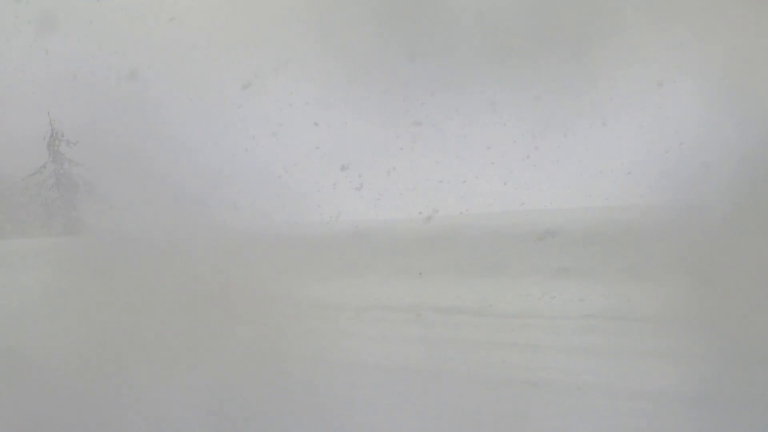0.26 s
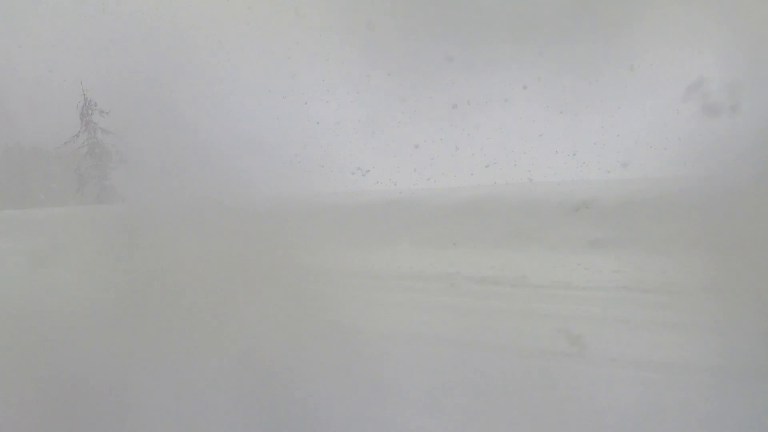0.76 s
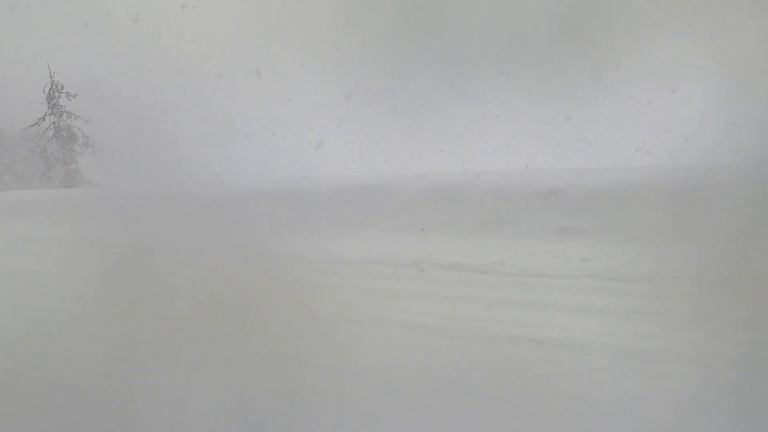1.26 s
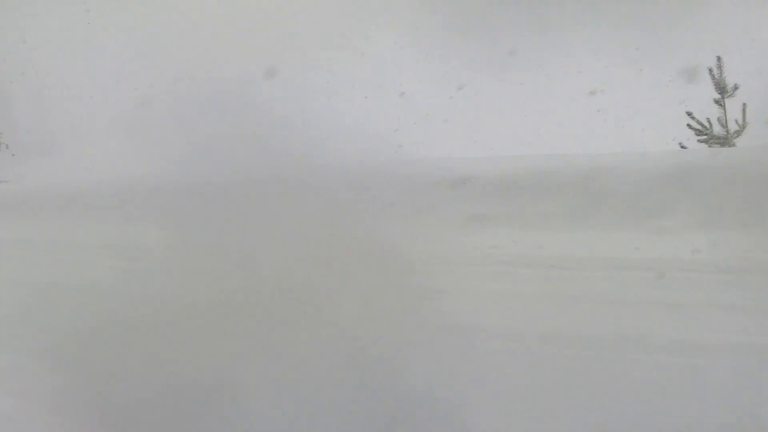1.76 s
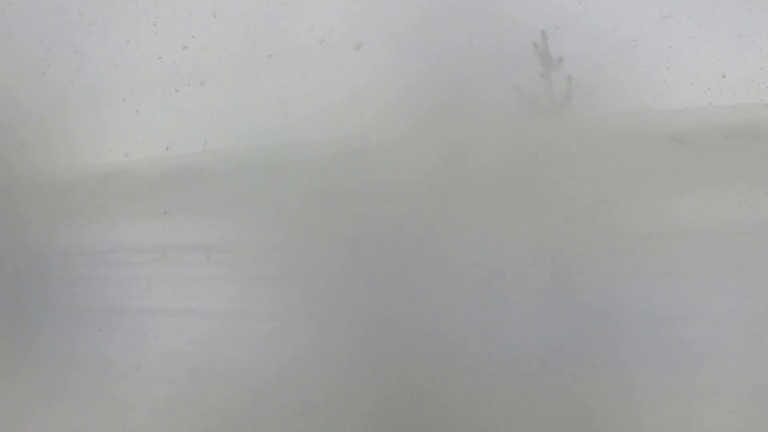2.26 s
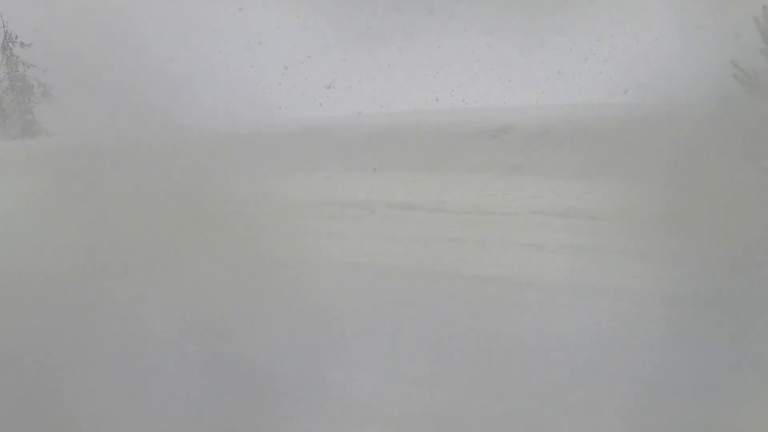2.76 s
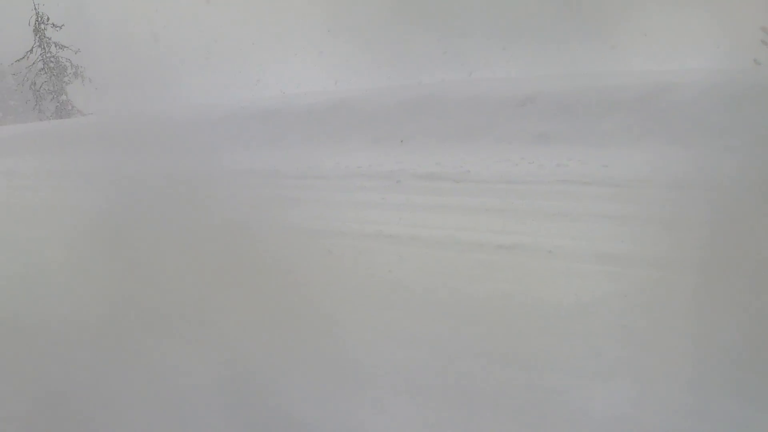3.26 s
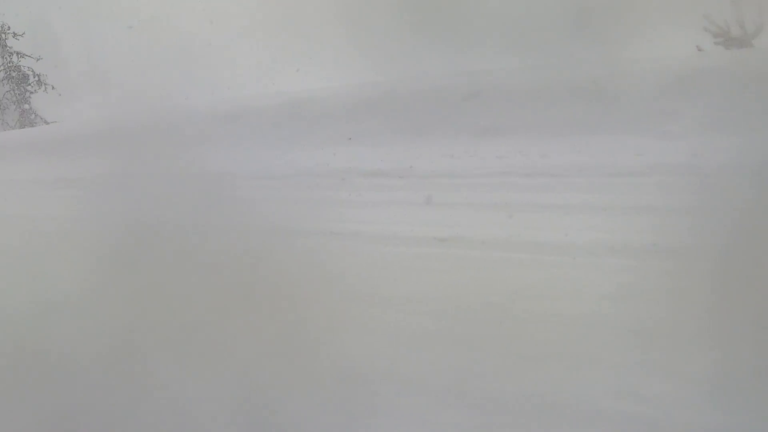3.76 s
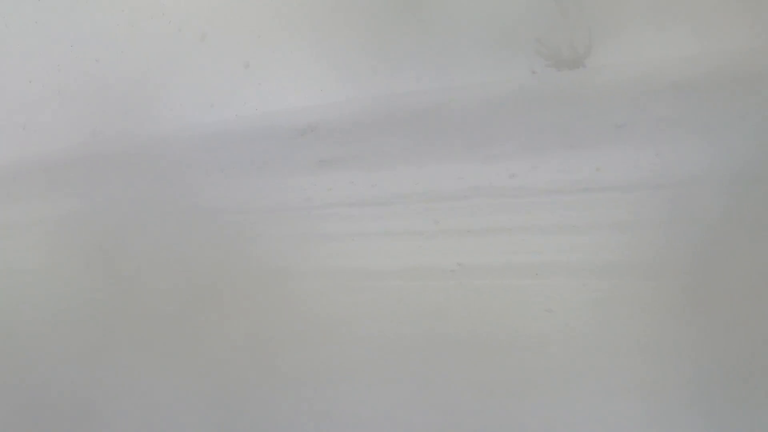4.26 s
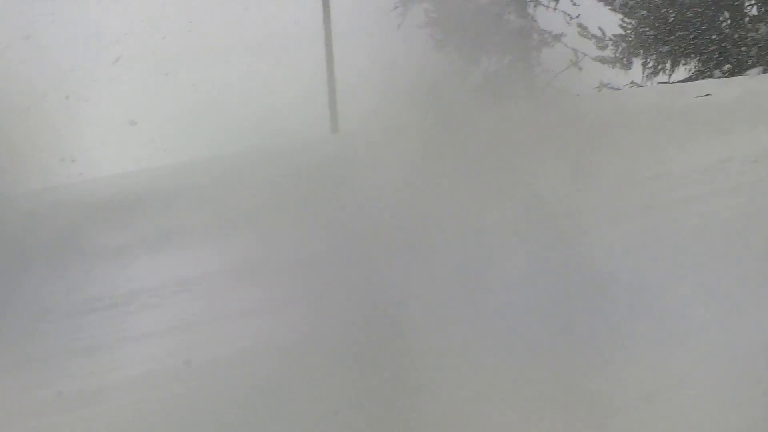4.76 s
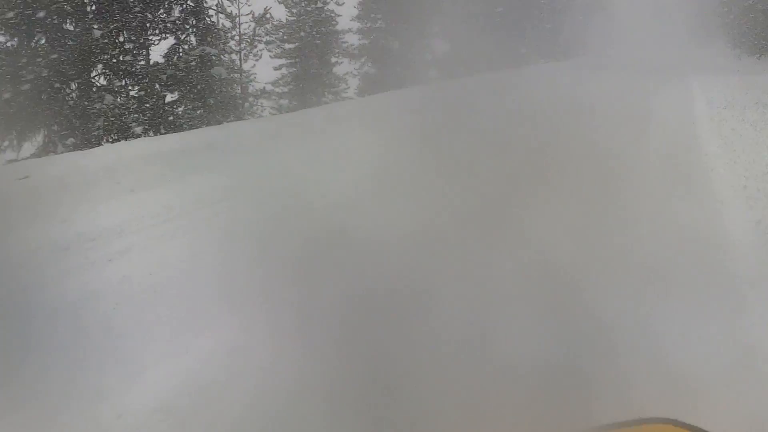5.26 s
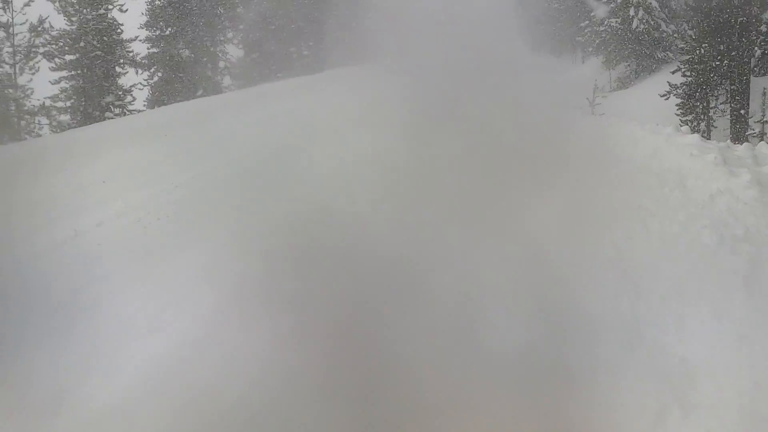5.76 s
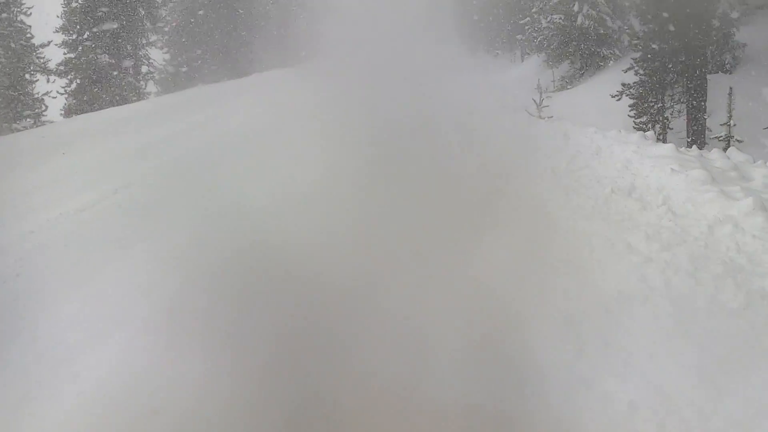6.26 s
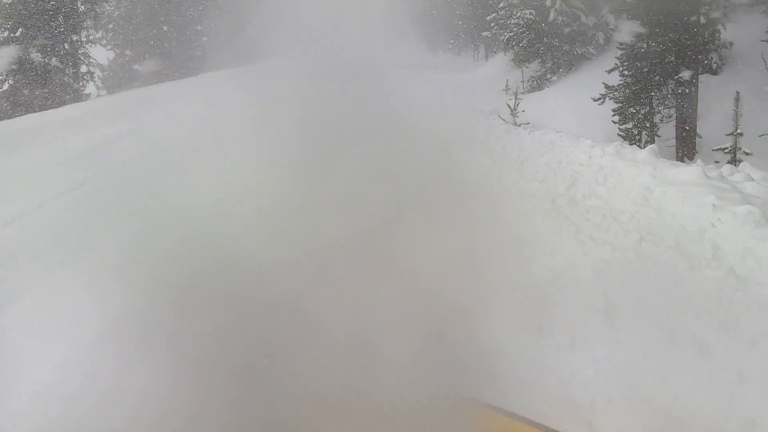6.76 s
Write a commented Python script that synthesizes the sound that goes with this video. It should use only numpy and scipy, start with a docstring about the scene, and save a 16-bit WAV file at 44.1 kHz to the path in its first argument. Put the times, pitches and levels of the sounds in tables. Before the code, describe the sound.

An on-board microphone rides a small tracked vehicle in deep snow, close and dry, with the right side muffled. From 0 to 1.9 s the engine fires low, around 60 beats a second sagging to about 51, stuttering with many misses over a soft rush, a pump hum and faint whistling whines. From 1.9 to 2.4 s it revs up sharply to about 90. It stumbles again around 2.8-3.4 s, then drones more evenly, slowly rising toward 100 by 4.7 s. Around 4.7-5.2 s snow roar, growl and brief bright puffs thicken, with a few missed beats. At 5.2-5.5 s it surges to about 118, dips slightly, then climbs to nearly 148 by 7 s. Hard clatter, singing overtones, gear whine, hissing spray and low rumble swell to their loudest at the end; fluttering wind thumps cluster after 6.5 s.

```python
"""Tracked vehicle in deep snow

A small tracked vehicle ploughs through deep snow, heard from a microphone on board.
The engine, summed from orders of its firing rate, runs unevenly, misfires and picks up speed.
A pump and gears whine faintly as drifting tones; track and snow are shaped noise that grows with load.
A few wind buffets are short low noise thumps. The right microphone port is muffled."""
import sys
import numpy as np
from scipy import signal
from scipy.fft import rfft, irfft, next_fast_len
from scipy.io import wavfile
from scipy.ndimage import uniform_filter1d

SR = 44100
rng = np.random.default_rng(int(sys.argv[2]) if len(sys.argv) > 2 else 0)


def dump(signal):
    """Clip the signal to [-1, 1] and save it as 16-bit WAV at the path in sys.argv[1]."""
    limited = np.clip(np.atleast_2d(signal).T, -1, 1)
    pcm = np.round(limited * 32767).astype(np.int16)
    wavfile.write(sys.argv[1], SR, pcm)


N = 308700
T = np.arange(N) / SR  # s
PADDED = next_fast_len(N + 8192)  # samples


def gain_of(db):
    """dB to gain."""
    return np.exp(np.asarray(db) * (np.log(10) / 20))


def evened(x):
    """Scales to rms 1."""
    return x / np.sqrt(np.mean(x ** 2) + 1e-20)


def read(points, hz):
    """Reads a spectrum on a log-frequency axis."""
    f, value = np.transpose(points)
    return np.interp(np.log(hz + 1), np.log(f + 1), value)


def curves(rows, t=T):
    """Reads every column of a curve table at times t."""
    s, *columns = np.transpose(rows)
    return [np.interp(t, s, c) for c in columns]


def fade(start_s, end_s, ramp_s):
    """Linear rise after start_s and fall before end_s."""
    return np.clip(np.minimum(T - start_s, end_s - T) / ramp_s, 0, 1)


def resonate(x, hz, width_hz):
    """Shifts hz down to zero, smooths, and shifts back: a resonance of gain 1."""
    turn = np.exp(2j * np.pi * hz * T)
    r = np.exp(-np.pi * width_hz / SR)
    return 2 * (turn * signal.lfilter([1 - r], [1, -r], x / turn)).real


def ring(x, hz, width_hz):
    """Two equal resonances in series, scaled to rms 1."""
    return evened(resonate(resonate(x, hz, width_hz), hz, width_hz))


def wander(per_s, t=T):
    """Slow random curve: straight lines between normal knots, per_s knots a second."""
    knots = rng.standard_normal(800)
    return np.interp(t * per_s, np.arange(800), knots)


# level between ports: pitch_hz, left_over_right_db
PORT_BALANCE = [(60, 1), (150, 1), (270, 1.3), (400, 2.6), (580, 6.5), (900, 9), (1610, 12.5), (2780, 11.5),
                (4810, 17), (7500, 23), (9500, 13.5), (13000, 6)]
# phase between ports: pitch_hz, left_lead_rad
PORT_LEAD = [(40, -.03), (100, -.08), (300, -.2), (800, -.45), (1640, -.9), (2240, -1.7), (3360, -1.4),
             (3900, -.9), (5000, 1.2), (7150, .9), (8000, 0)]


def ports(x):
    """One source at both ports, differing in level and phase by frequency; the mean keeps its spectrum."""
    hz = np.fft.rfftfreq(PADDED, 1 / SR)
    half = gain_of(read(PORT_BALANCE, hz) / 2) * np.exp(.5j * read(PORT_LEAD, hz))
    pair = np.array([half, 1 / half])
    return irfft(rfft(x, PADDED) * pair / abs(pair.mean(0)), PADDED)[:, :N]


# noise shared by the ports: pitch_hz, likeness_0_to_1
PORT_LIKENESS = [(40, .3), (120, .6), (250, .65), (500, .82), (1010, .55), (2030, .86), (3200, .8),
                 (4800, .55), (8330, .65), (12000, .75)]


def noise(db_field, patchy_db):
    """Two-port noise from random short-time spectra; db_field(hz, t) shapes it, port mean at rms 1."""
    frames = N // 256 + 5
    hz = np.fft.rfftfreq(1024, 1 / SR)
    a, b, c, d, patches = rng.standard_normal((frames, 513, 5)).T
    patches = uniform_filter1d(patches, size=8, axis=0)
    patches = evened(uniform_filter1d(patches, size=12, axis=1))
    same = np.clip(read(PORT_LIKENESS, hz), -1, 1)[:, None]
    left = a + 1j * b
    right = same * left + np.sqrt(1 - same ** 2) * (c + 1j * d)
    right = right * np.exp(-1j * read(PORT_LEAD, hz))[:, None]
    half = gain_of(read(PORT_BALANCE, hz) / 2)[:, None]
    z = np.array([left * half, right / half]) / np.hypot(half, 1 / half)
    z *= gain_of(db_field(hz[:, None], np.arange(frames) * 256 / SR) + patchy_db * patches)
    out = signal.istft(z, nperseg=1024, noverlap=768)[1][:, :N]
    return out / np.sqrt(np.mean(out.mean(0) ** 2))


def steady_noise(points, patchy_db):
    """Two-port noise of one fixed spectrum."""
    return noise(lambda hz, t: read(points, hz) + 0 * t, patchy_db)


# wind buffets: centre_s, level_db
WIND_GUSTS = [(1.155, -31), (3.34, -31), (5.0, -29), (6.11, -30), (6.525, -25), (6.68, -19), (6.735, -24),
              (6.81, -24), (6.885, -21), (6.935, -25)]
GUST_HALF_S, GUST_TOP_HZ = .008, 300


def gusts():
    """Wind on the ports: short low noise thumps, unrelated left and right."""
    band = signal.butter(2, [50, GUST_TOP_HZ], "bandpass", fs=SR, output="sos")
    air = signal.sosfilt(band, rng.standard_normal((2, N)))
    return evened(air) * sum(gain_of(db) * np.exp(-((T - s) / GUST_HALF_S) ** 2) for s, db in WIND_GUSTS)


# pump: time_s, pitch_hz, base_level_db
PUMP_CURVE = [(0, 136.3, -55.5), (.3, 134.3, -55), (1, 132.7, -51.5), (1.7, 130.8, -49.5),
              (3.1, 127.8, -49), (4.1, 127.1, -47.5), (4.6, 127.6, -51), (5.3, 124.2, -54), (7, 127.5, -79)]
# pump harmonics and other multiples: multiple, over_base_db
PUMP_MULTIPLES = [(1, 17), (4, 1.5), (5, -2), (8, 1), (8.58, -4), (12, -11), (25.8, -22)]


def pump():
    """Small pump: multiples of a sagging pitch, wavering in level and phase."""
    hz, base_db = curves(PUMP_CURVE)
    angle = 2 * np.pi * np.cumsum(hz) / SR
    out = 0
    for k, rel_db in PUMP_MULTIPLES:
        level = gain_of(base_db + rel_db + 0.5 * wander(11.0))
        out = out + level * np.cos(k * angle + .5 * wander(15))
    return np.sqrt(2) * out


# faint tones: start_pitch_hz, end_pitch_hz, level_db, start_s, end_s
DRIFTING_TONES = [(1335, 1305, -51, -.1, 2.1), (1545, 1500, -53, -.1, 2.2), (1532, 1528, -51, .7, 2.3),
                  (1530, 1526, -54, 2.4, 5.3), (2375, 2350, -58, .5, 2.3), (2262, 2258, -62, 1, 2.3),
                  (1155, 1138, -51, 2.5, 4.7), (2160, 2200, -61, 2.5, 4.6), (2340, 2330, -60, 2.3, 4.2),
                  (2616, 2616, -63, 2.6, 4.8), (3935, 3925, -75, 0, 2.1), (4770, 4760, -70, 2, 2.7),
                  (3180, 3172, -63, 4.4, 5.4), (3770, 3770, -66, 4.4, 5.4), (3111, 3111, -56, 5.4, 6.2),
                  (3650, 3660, -62, 5.3, 6.1), (5400, 5400, -67, 5.1, 6.2)]
# fuzzy whistles: pitch_hz, stage_width_hz, level_db, start_s, end_s
WHISTLES = [(1535, 60, -53, .3, 1.9), (1315, 50, -56, .2, 2.0), (1110, 60, -53, 0, 2.3),
            (2345, 50, -62, 0, 2.3)]


def whines():
    """Pump hum, gliding tones that waver, and whistles of narrowly resonated noise."""
    out = pump()
    for first_hz, last_hz, db, start, end in DRIFTING_TONES:
        since = T - start
        mean_hz = first_hz + (last_hz - first_hz) * since / (2 * (end - start))  # since the start
        level = fade(start, end, .3) * gain_of(db + 1.6 * wander(9))
        out += np.sqrt(2) * level * np.cos(2 * np.pi * mean_hz * since + .9 * wander(22))
    air = rng.standard_normal(N)
    for hz, width_hz, db, start, end in WHISTLES:
        level = np.sqrt(2) * gain_of(db - 3)
        out += level * fade(start, end, .3) * ring(air, hz, width_hz)
    return out


# panels rung by clatter and rush: pitch_hz, width_hz, gain_db
HULL_PANELS = [(320, 90, -1), (468, 18, 2.5), (674, 360, -6.5), (959, 36, -2), (1157, 74, -1),
               (1210, 170, -3), (1450, 25, 0.5), (1609, 26, -3), (2320, 320, -15), (3300, 33, -24.5)]


def hull(hz, floor_db):
    """Gain of the panels at hz: resonance peaks added to a flat floor."""
    return gain_of(floor_db) + sum(gain_of(db) / (1 + (2 * (hz - f) / w) ** 2) for f, w, db in HULL_PANELS)


# engine load: time_s, load_0_to_1, firing_unevenness_db
ENGINE_LOAD = [(0, 0.13, -1), (1.9, 0.03, -1), (2.42, 0.6, -1.3), (2.9, 0.48, 0.6), (4.58, 0.61, 0.4),
               (4.72, 0.7, 1), (5.3, 0.87, 1), (6, 0.88, 0.5), (6.5, 0.91, 1.5), (7, 0.88, -3)]
# low rumble: time_s, level_db
RUMBLE_LEVEL = [(0, -34), (2, -47), (4, -40.5), (4.5, -43), (5, -29), (5.5, -37.5), (6, -34.5), (6.5, -26),
                (7, -21.5)]
RUMBLE_TOP_HZ, RUMBLE_FOOT_HZ, RUMBLE_RISE = 79.5, 35, 0.44  # edges at no load; their share of rise at full


def rumble():
    """Low buffeting: noise between two soft edges that rise with load."""
    def shape(hz, t):
        hz = (hz + 1) / (1 + RUMBLE_RISE * curves(ENGINE_LOAD, t)[0])
        top_db = -12 * np.log2(1 + (hz / RUMBLE_TOP_HZ) ** 2)
        return top_db - 12 * np.log2(1 + (RUMBLE_FOOT_HZ / hz) ** 2)
    return noise(shape, patchy_db=1.0) * gain_of(curves(RUMBLE_LEVEL)[0])


# rush spectrum at no load: pitch_hz, density_db_per_hz
CALM_SPECTRUM = [(120, -26.5), (200, -1), (230, -4.5), (310, -8), (440, -10), (600, -17), (850, -22.5),
                 (1050, -19.5), (1420, -15.5), (1540, -19.5), (1800, -21), (2310, -18), (3000, -29),
                 (3900, -69)]
# rush spectrum at full load, before the hull: pitch_hz, density_db_per_hz
HARD_SPECTRUM = [(120, -32), (200, -25), (263, 0), (311, -10), (463, -10), (536, -20.5), (680, -7),
                 (853, -14), (966, -3.5), (1060, -13), (1630, -15.5), (2040, -21), (3000, -26),
                 (3900, -61.5), (6600, -120)]


def rush_body():
    """Main rush: its spectrum moves with load into one rung by the hull; level evened over 0.5 s."""
    def shape(hz, t):
        load = np.clip(curves(ENGINE_LOAD, t)[0], 0, 1)
        hard_db = read(HARD_SPECTRUM, hz) + 20 * np.log10(hull(hz, floor_db=6.0))
        return (1 - load) * read(CALM_SPECTRUM, hz) + load * hard_db
    low = noise(shape, patchy_db=-1.0)
    return low / np.sqrt(uniform_filter1d(low.mean(0) ** 2, size=22050))


# time_s, rush_db, roar_db, spray_db, hiss_db
RUSH_LEVELS = [(0, -39, -49, -59, -63), (.47, -40.5, -52, -62.5, -65), (1, -39.5, -59, -59, -61.5),
               (1.9, -37.5, -50, -59, -60.5), (2.2, -35.5, -46.5, -54.5, -63), (2.45, -36.5, -40, -53, -65),
               (2.8, -36.5, -48, -58.5, -63.5), (3.05, -37, -45, -56.5, -62.5),
               (3.6, -38, -46, -59.5, -61.5), (3.85, -36.5, -43.5, -56, -61), (4.6, -34, -42.5, -55, -63),
               (4.72, -35, -36, -51, -62.5), (5, -32, -36, -51.5, -61.5), (5.3, -31, -37.5, -45, -63),
               (5.54, -29, -34, -44, -60.5), (5.85, -29.5, -37, -44.5, -60.5), (6.26, -27, -35, -43, -56),
               (6.5, -25.5, -45, -40, -57.5), (7, -23, -41, -42, -55)]
# roar near 650 Hz, spray, top hiss, growl near 1 kHz: pitch_hz, density_db_per_hz
ROAR_SPECTRUM = [(250, -42), (420, -13.5), (560, 1.5), (700, 4), (820, -0.5), (1200, -19.5), (2000, -48),
                 (6000, -130)]
SPRAY_SPECTRUM = [(1800, -18.5), (2600, -10.5), (3100, 1.5), (3500, -3), (3900, -4.5), (5000, -10.5),
                  (6500, -18.5), (8000, -31.5), (10000, -37), (13000, -55), (16000, -95)]
HISS_SPECTRUM = [(3500, -10.5), (4800, -2), (6300, 2), (7500, 4), (8000, -3), (8800, -13), (9500, -20.5),
                 (12000, -22.5), (15000, -34), (16000, -58)]
GROWL_SPECTRUM = [(600, -52.5), (850, -14.5), (920, -1), (1010, 0), (1120, -6.5), (1300, -19.5),
                  (2000, -60)]
# growl: time_s, level_db
GROWL_LEVEL = [(0, -65), (2.2, -62), (2.42, -51), (2.8, -61), (4.1, -51), (4.6, -42), (4.75, -40.5),
               (5.2, -39), (5.5, -47.5), (6.1, -47.5), (6.5, -41), (7, -42)]
# brief treble bursts: centre_s, hiss_level_db
TREBLE_PUFFS = [(4.99, -62), (5.022, -64), (5.04, -67), (5.1, -63), (5.115, -67), (5.165, -70)]
PUFF_HALF_S, PUFF_SPRAY_DB = .006, 16  # the spray band takes this much more


def rush(turns):
    """Track and snow: noise bands following level curves, all but the rumble throbbing with the firing."""
    level_db, roar_db, spray_db, hiss_db = curves(RUSH_LEVELS)
    puffs = sum(gain_of(db) * np.exp(-((T - s) / PUFF_HALF_S) ** 2) for s, db in TREBLE_PUFFS)
    snow = rush_body() * gain_of(level_db)
    snow += steady_noise(ROAR_SPECTRUM, patchy_db=0.0) * gain_of(roar_db)
    spray_gain = gain_of(spray_db) + gain_of(PUFF_SPRAY_DB) * puffs
    snow += steady_noise(SPRAY_SPECTRUM, patchy_db=1.5) * spray_gain
    snow += steady_noise(HISS_SPECTRUM, patchy_db=2.5) * (gain_of(hiss_db) + puffs)
    snow += steady_noise(GROWL_SPECTRUM, patchy_db=1.5) * gain_of(curves(GROWL_LEVEL)[0])
    throb = 1 + 0.032 * np.cos(2 * np.pi * turns)
    return snow * throb + rumble()


# half orders that stand out or hold back: half_order: level_db
CLATTER_ACCENTS = {7: -3, 8: -10, 10: -6, 14: 1, 16: -3, 17: -8, 19: -8, 20: -6, 21: -5, 22: -8, 23: -4, 24:
                   -10, 25: -8, 26: -6, 27: 9, 28: -8}
CLATTER_DB, CLATTER_LOAD_DB = -73, 39  # base gain at no load, rise to full load


def clatter(angle, load):
    """Valve and piston clatter: repeats every second firing, so half orders show; rings the hull."""
    t, out = T[::4], 0  # made at a quarter of the rate
    for k in range(7, 64):
        level = gain_of(CLATTER_ACCENTS.get(k, 0) + 3.8 * wander(5, t) - 6.7 * (k % 2))
        phase = 2 * np.pi * rng.random() + 0.42 * wander(20, t)
        out = out + level * np.cos(k * angle[::4] / 2 + phase)
    out = out * gain_of(CLATTER_DB + CLATTER_LOAD_DB * load[::4])
    out = signal.resample_poly(out, up=4, down=1)
    panels = hull(np.fft.rfftfreq(PADDED, 1 / SR), floor_db=-30.5)
    return irfft(rfft(out, PADDED) * panels, PADDED)[:N]


# exhaust modes: pitch_hz, stage_width_hz, level_db
PIPE_MODES = [(110, 47, -41), (175.6, 15, -38), (290, 58, -48.5)]


def pipe(cycle, charge, chance):
    """Exhaust modes rung by one uneven kick per firing."""
    kicks = np.diff(cycle, prepend=0) * (0.18 * (charge - 1) + 0.67 * chance[cycle])
    return sum(gain_of(db) * ring(kicks, hz, width_hz) for hz, width_hz, db in PIPE_MODES)


# gear whine by its own pitch: pitch_hz, level_db
GEAR_LEVEL = [(560, -57), (680, -45), (800, -46), (905, -46), (955, -36.5), (1000, -38), (1100, -37),
              (1150, -36), (1190, -43), (1250, -52), (1330, -46), (1400, -42)]
GEAR_ORDER = 9.65  # multiple of firing rate


def gears(hz, angle):
    """Gear whine: a wavering tone at a fixed multiple of the firing rate."""
    level = gain_of(read(GEAR_LEVEL, GEAR_ORDER * hz) + 1.3 * wander(12))
    return np.sqrt(2) * level * np.cos(GEAR_ORDER * angle + .6 * wander(25))


# firing overtones that sing out for a while: multiple, level_db, start_s, end_s
SINGING_OVERTONES = [(5, -48, 2.35, 2.85), (8.5, -53, 2.1, 2.9), (3.5, -47, 2.35, 3.4),
                     (5, -48, 3.45, 4.05), (6, -49, 3.6, 4.9), (11, -43, 4.55, 5.35), (11.5, -45, 4.6, 5.1),
                     (9, -45, 4.85, 5.35), (12.5, -43, 4.9, 5.35), (8.5, -41, 5.25, 6.0),
                     (4, -35, 5.28, 6.2), (12.5, -43, 5.6, 6.05), (10.5, -44, 5.65, 6.2),
                     (3.5, -36, 5.9, 6.7), (3, -39, 5.95, 6.35), (13, -47, 5.95, 6.35),
                     (9.5, -37, 6.05, 6.65), (8.5, -36.5, 6.2, 7.2), (11, -40, 6.25, 6.65),
                     (12, -37.5, 6.3, 6.7), (10, -40, 6.55, 7.2), (10.5, -45, 6.6, 7.2),
                     (9, -43, 6.0, 6.35), (7.5, -43, 6.0, 6.7), (11.5, -47, 6.6, 7.2)]
SWELL_S = .12


def overtones(angle):
    """Multiples of the firing rate that swell and fade."""
    out = 0
    for k, db, start, end in SINGING_OVERTONES:
        level = fade(start, end, SWELL_S) * gain_of(db + 1.1 * wander(10))
        out = out + level * np.cos(k * angle + .4 * wander(15))
    return np.sqrt(2) * out


# firing: time_s, rate_hz
FIRING_RATE = [(0, 61.6), (.24, 59.33), (.6, 55.34), (1.21, 51.36), (1.57, 51.65), (1.98, 61.23),
               (2.18, 73.36), (2.4, 90.8), (2.5, 91.9), (2.78, 88.56), (3.04, 86.06), (3.3, 89.6),
               (4.29, 96.43), (4.7, 99.13), (4.99, 99.6), (5.21, 102.2), (5.5, 118.2), (5.6, 117.6),
               (5.72, 114.3), (5.91, 116), (6.1, 123.9), (6.3, 127.7), (6.5, 132.7), (6.65, 138.4),
               (6.8, 141.2), (7, 147.8)]
# missed firings: time_s, nominal_depth_db
MISSED_FIRINGS = [(0.057, 18.5), (0.082, 22.5), (0.124, 12.5), (0.177, 19), (0.203, 11), (0.258, 15),
                  (0.348, 11), (0.397, 22.5), (0.42, 8.5), (0.525, 12.5), (0.579, 14), (0.643, 12.5),
                  (0.668, 18), (0.746, 9.5), (0.832, 13.5), (0.91, 16.5), (1.058, 12), (1.091, 7),
                  (1.159, 15.5), (1.233, 18.5), (1.258, 22), (1.328, 20), (1.43, 8), (1.464, 13.5),
                  (1.529, 13.5), (1.64, 6), (1.704, 17), (1.867, 18.5), (1.954, 12), (2.84, 8), (2.912, 21),
                  (2.979, 14.5), (3.026, 25), (3.041, 12.5), (3.08, 18), (3.121, 6.5), (3.167, 8),
                  (3.234, 11), (3.28, 13.5), (3.322, 14), (3.366, 5.5), (3.433, 13.5), (4.541, 22.5),
                  (4.974, 21.5), (5.008, 22), (5.085, 18), (5.132, 5.5), (6.155, 6.5), (6.296, 4.5),
                  (6.674, 5.5), (6.795, -3), (6.959, 11.5)]
# exhaust gain on the orders: pitch_hz, gain_db
EXHAUST_GAIN = [(55, -21.5), (75, -14), (95, -14), (112, -13), (145, -16.5), (178, -23.5), (189, -25),
                (200, -35.5), (225, -35), (262, -20.5), (295, -17), (315, -15.5), (345, -24), (410, -29.5),
                (462, -24.5), (505, -19), (540, -30.5), (600, -35.5)]
# orders against the beat at no load, before the exhaust
SECOND_DB, THIRD_DB, FOURTH_DB, FIFTH_DB, SIXTH_DB = -5.5, -7.5, -31.5, -22.5, -30.5
# their change to full load
SECOND_LOAD_DB, THIRD_LOAD_DB, FOURTH_LOAD_DB, FIFTH_LOAD_DB = 1.5, -15, 13.5, -17
IDLE_DIP, DIP_PER_LOAD = .55, 1  # share of misfire depth the beat loses at no load, rise with load
SWING_PER_DB = 0.0348 * 1.6  # scale of the slow pressure swing against the beat, per dB of depth


def engine():
    """Firing beat and its orders; a misfire drops and shifts the beat and the next charge fires harder."""
    hz, = curves(FIRING_RATE)
    load, rough_db = curves(ENGINE_LOAD)
    turns = np.cumsum(hz * (1 + 0.0032 * wander(30))) / SR  # firings so far
    angle = 2 * np.pi * turns
    cycle = turns.astype(int)
    s, depth_db = np.transpose(MISSED_FIRINGS)
    cycles = (T[::20] - s[:, None]) * np.interp(s, T, hz)[:, None]  # firings since each misfire

    def around(at, width):
        """Misfire depths as bumps, placed in firings after the miss."""
        return np.interp(T, T[::20], depth_db @ np.exp(-((cycles - at) / width) ** 2))

    def order_db(k, db, load_db):
        """Level of order k through the exhaust."""
        return db + load_db * load + read(EXHAUST_GAIN, k * hz)

    beat_db = order_db(1, 0, 0)
    second_db = order_db(2, SECOND_DB, SECOND_LOAD_DB)
    third_db = order_db(3, THIRD_DB, THIRD_LOAD_DB)
    fourth_db = order_db(4, FOURTH_DB, FOURTH_LOAD_DB)
    fifth_db = order_db(5, FIFTH_DB, FIFTH_LOAD_DB)
    sixth_db = order_db(6, SIXTH_DB, 0)

    uneven_db = rough_db * uniform_filter1d(rng.standard_normal(2000)[cycle], size=200)
    harder_db = np.minimum(0.77 * around(1.7, 0.45), 3.)
    dip_db = np.clip(IDLE_DIP + DIP_PER_LOAD * load, 0, 1) * around(0, 0.71)
    charge = gain_of(harder_db - dip_db + uneven_db)
    slip = 0.086 * (around(0.29, 0.6) - 0.29 * around(-0.59, 0.94))  # rad
    out = -gain_of(beat_db) * charge * np.cos(angle + slip)

    swing = np.interp(T, T[::20], depth_db @ (cycles / .6 * np.exp(-(cycles / 0.47) ** 2)))
    out -= gain_of(beat_db) * SWING_PER_DB * np.clip(load, 0, 1) * swing

    # pumping goes on through a misfire
    pumping_db = second_db + np.minimum(0.46 * around(0.86, 0.35), 3.)
    pumping_db += uneven_db - 0.21 * around(-0.13, 0.28)
    out -= gain_of(pumping_db) * np.cos(2 * angle + 0.68 + 1.57 * slip)
    out -= gain_of(third_db) * np.sqrt(charge) * np.cos(3 * angle + slip + .45 * wander(14))
    out += gain_of(fourth_db + 1.2 * wander(13.0)) * np.cos(4 * angle + 0.25 * wander(24))
    out += gain_of(fifth_db + 1.5 * wander(10)) * np.cos(5 * angle + .6 * wander(15))
    out += gain_of(sixth_db + 2 * wander(8)) * np.cos(6 * angle + .6 * wander(15))
    for k, db in [(1, -23), (3, -22.5), (5, -37)]:  # the two cylinders differ a little: half orders
        out += gain_of(beat_db + db + 1.0 * wander(26)) * np.cos(k * angle / 2 + 1.5 * wander(14))

    motor = np.sqrt(2) * out + gears(hz, angle) + overtones(angle)
    motor += clatter(angle, load) + pipe(cycle, charge, rng.standard_normal(2000))
    return motor, turns


def scene():
    """Engine and whines through the port pair, plus the rush and the wind."""
    motor, turns = engine()
    edges = np.minimum(np.minimum(T, T[::-1]) / .004, 1)  # 4 ms fades
    return ports((motor + whines()) * edges) + rush(turns) + gusts()


EDGE_HZ = 15500


def record(dry):
    """Microphone: loud peaks round off softly, then a low-pass band limit."""
    ceiling = 1.3
    soft = ceiling * np.tanh(dry / ceiling)
    low_pass = signal.firwin(511, EDGE_HZ, window=("kaiser", 9), fs=SR)
    return signal.oaconvolve(soft, low_pass[None], "same")


dry = scene()
out = record(dry)
dump(out)
```